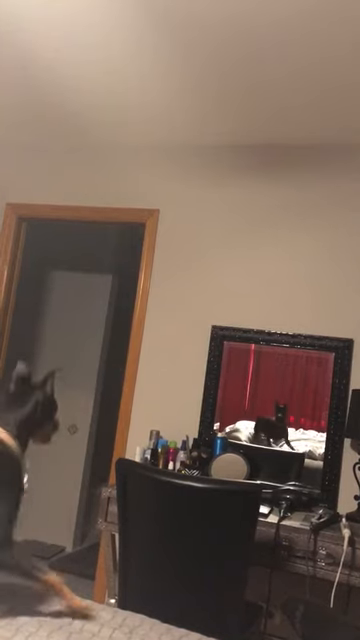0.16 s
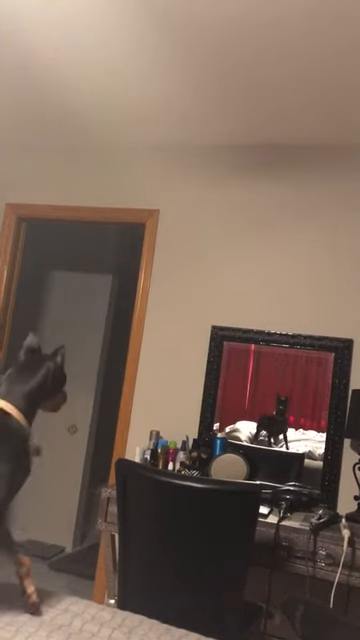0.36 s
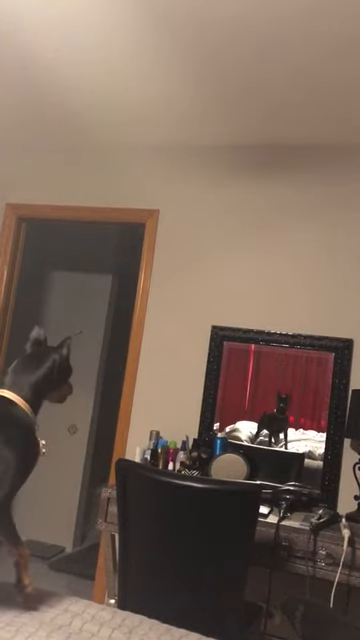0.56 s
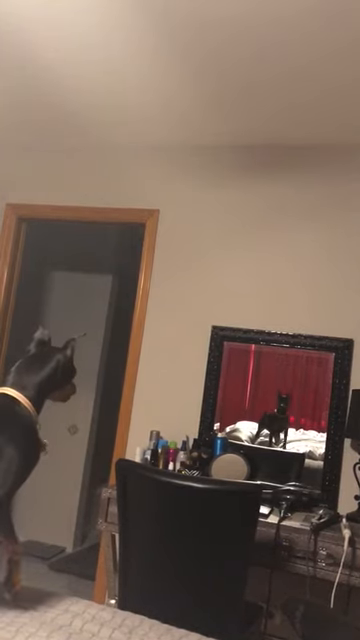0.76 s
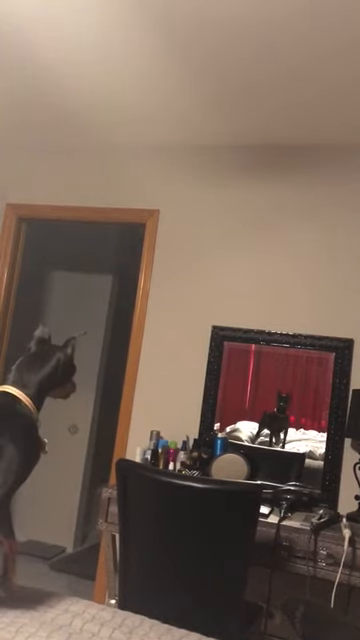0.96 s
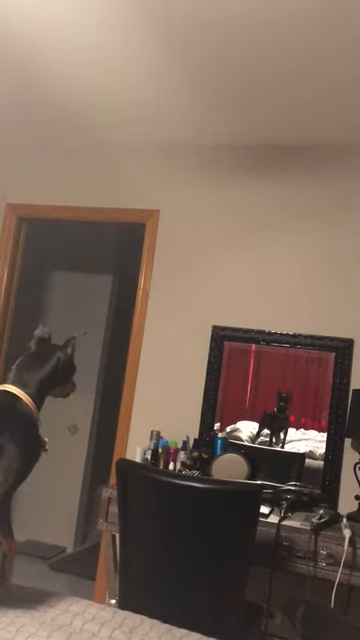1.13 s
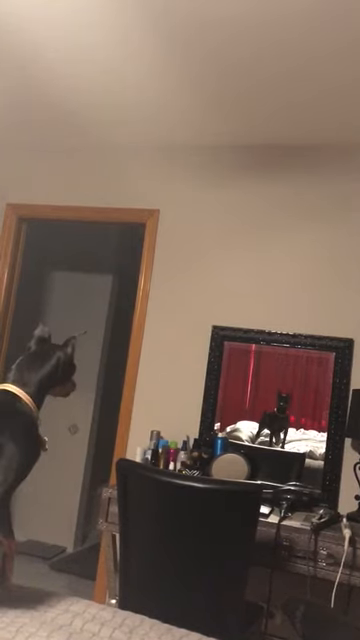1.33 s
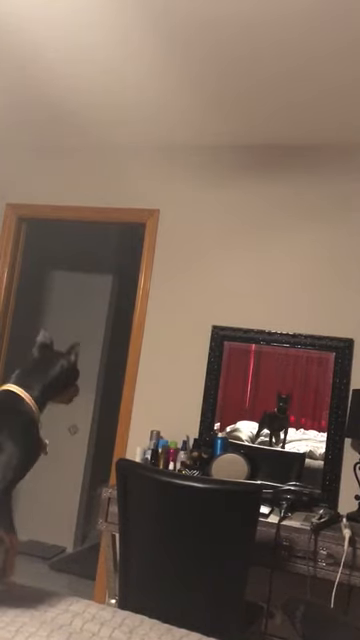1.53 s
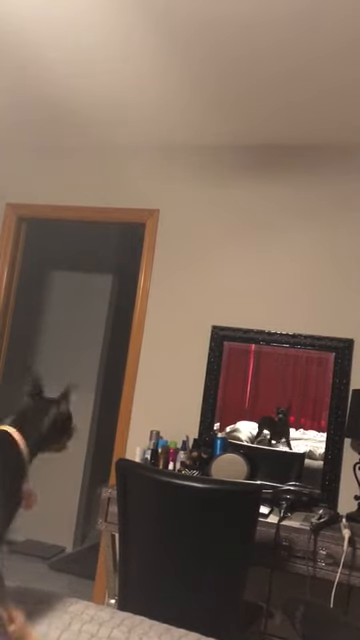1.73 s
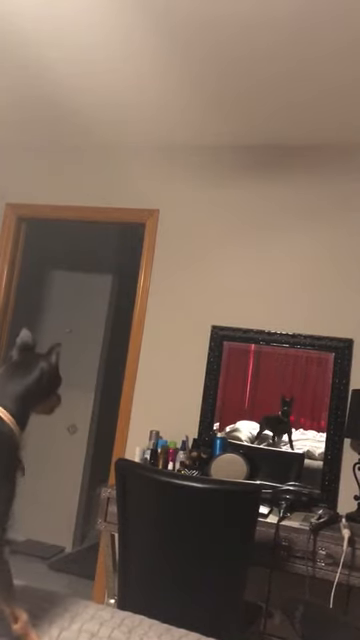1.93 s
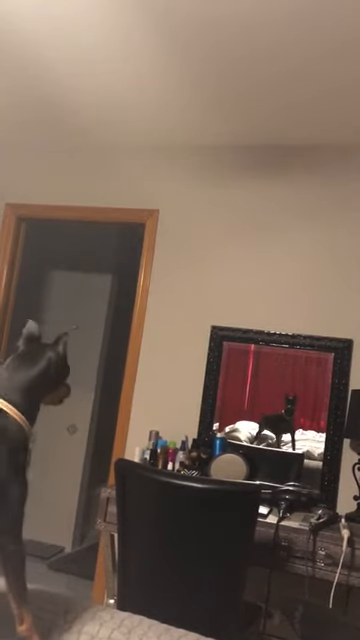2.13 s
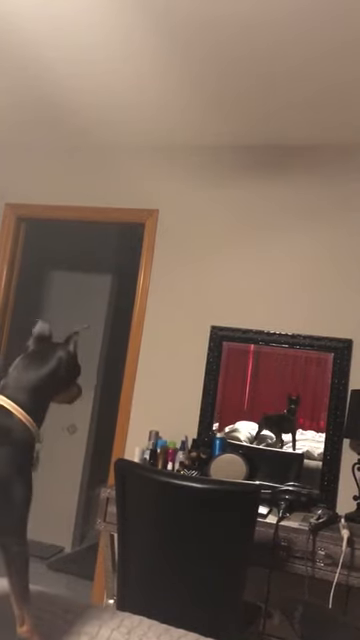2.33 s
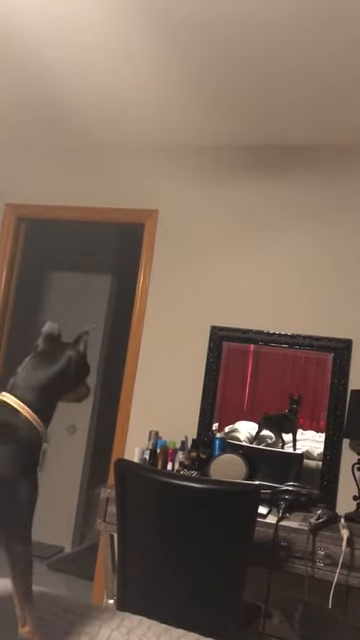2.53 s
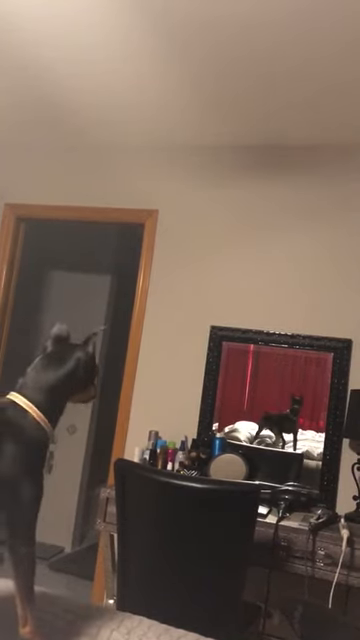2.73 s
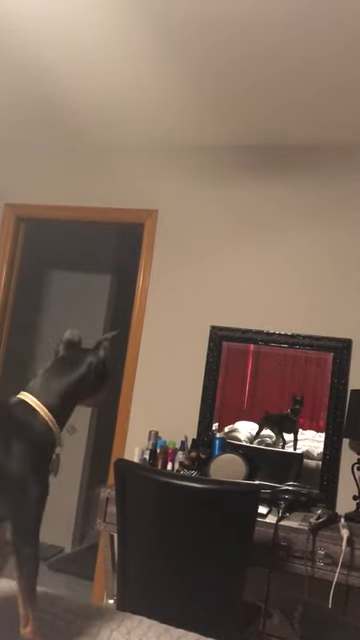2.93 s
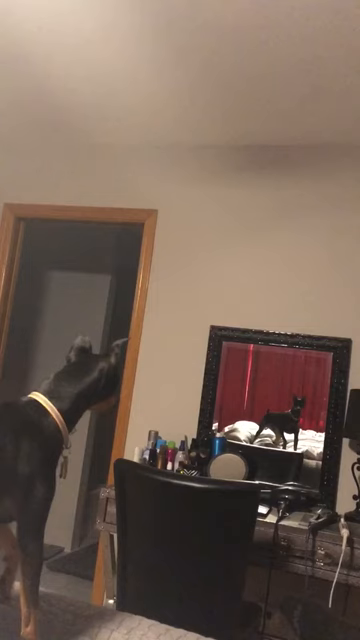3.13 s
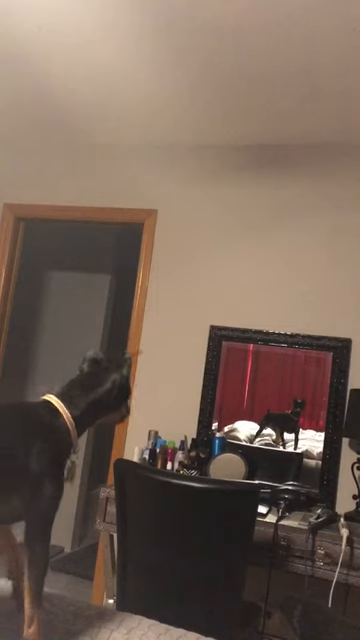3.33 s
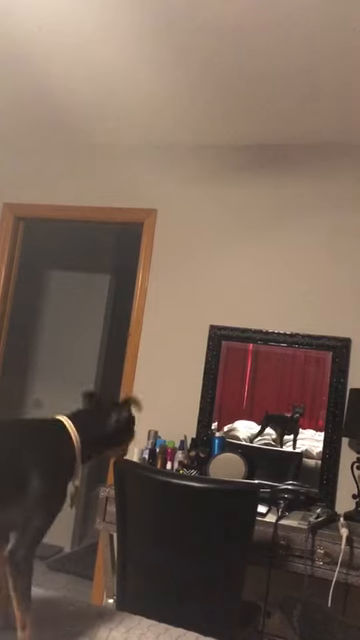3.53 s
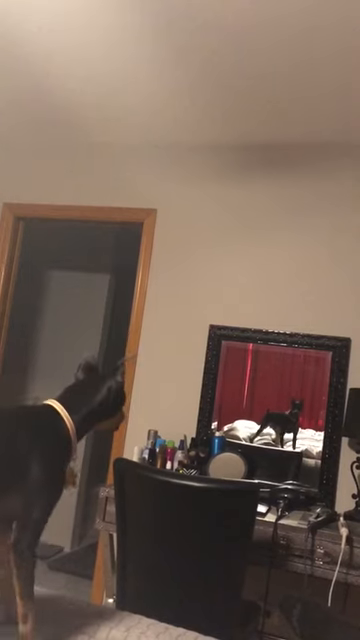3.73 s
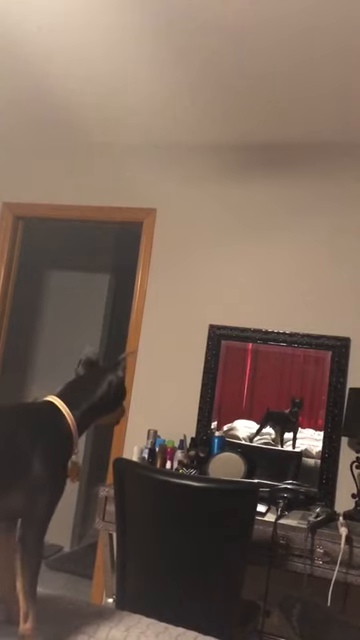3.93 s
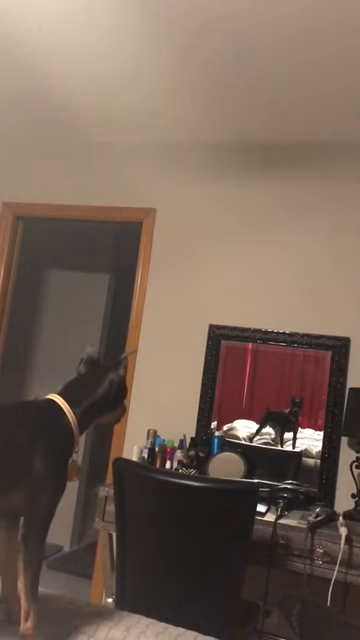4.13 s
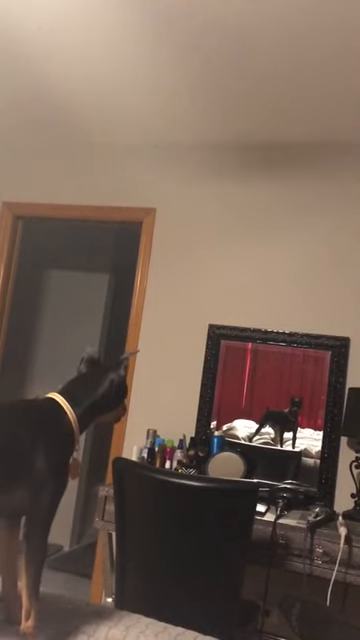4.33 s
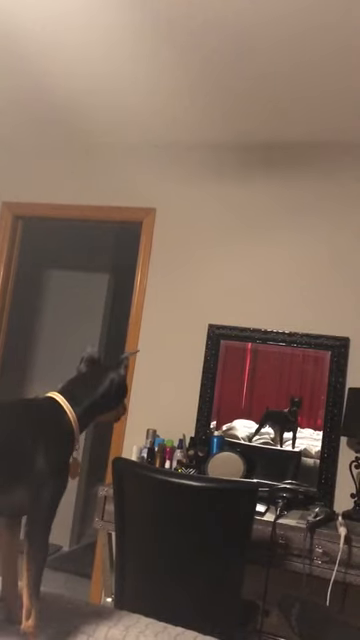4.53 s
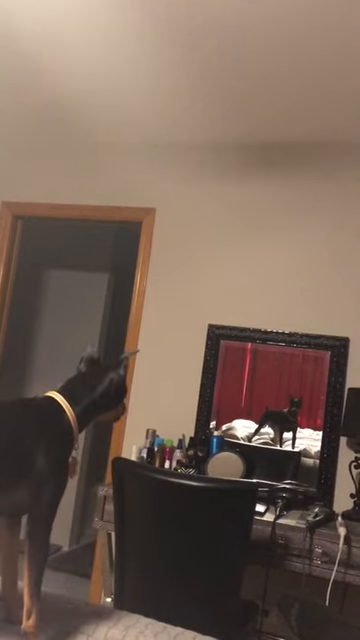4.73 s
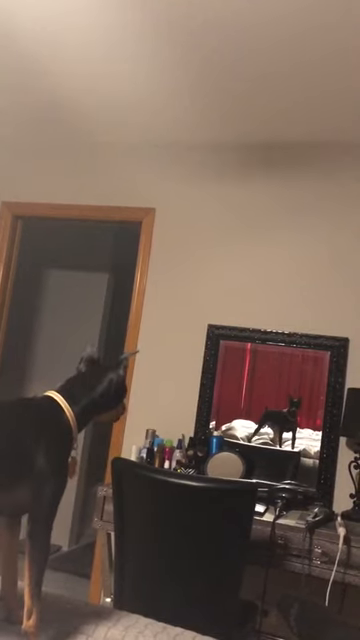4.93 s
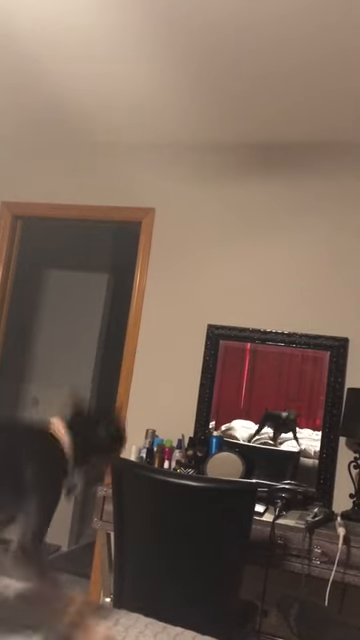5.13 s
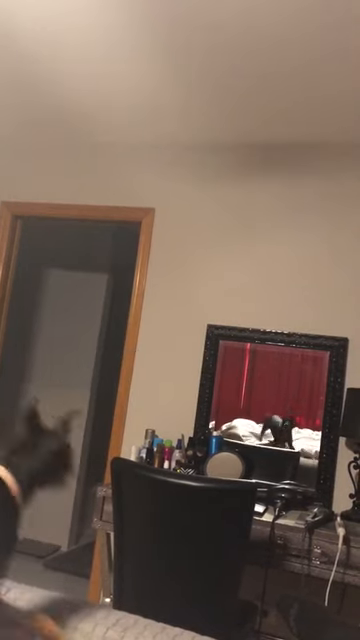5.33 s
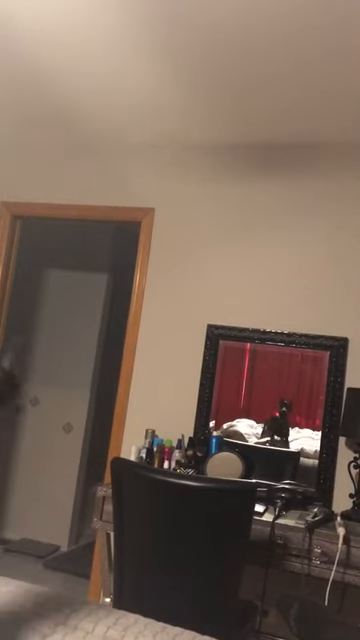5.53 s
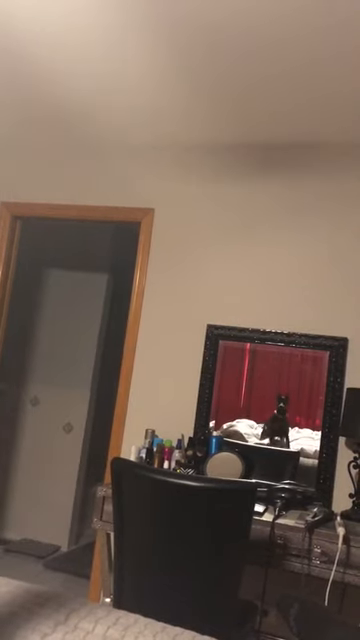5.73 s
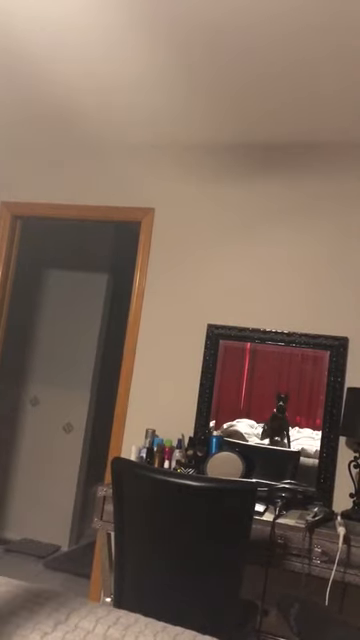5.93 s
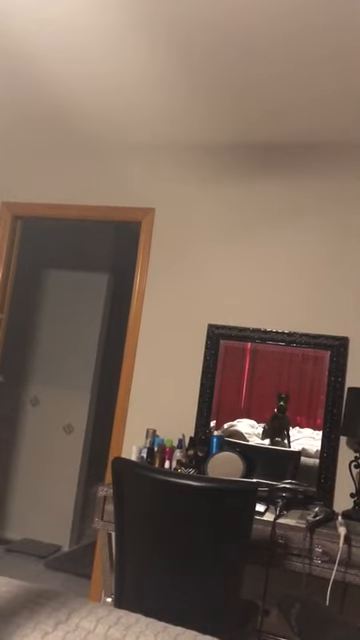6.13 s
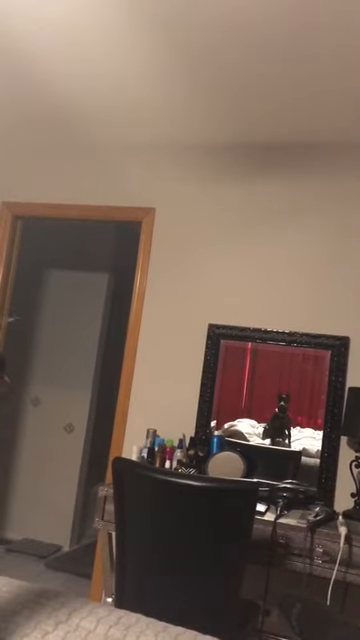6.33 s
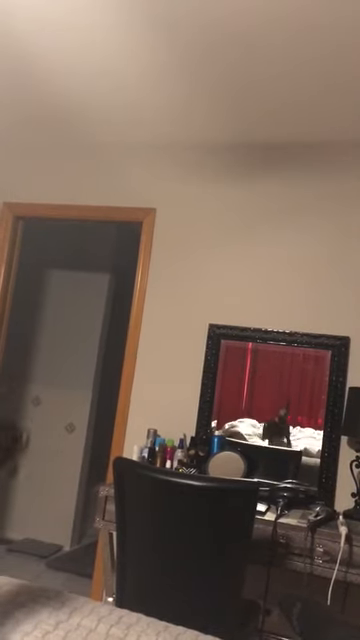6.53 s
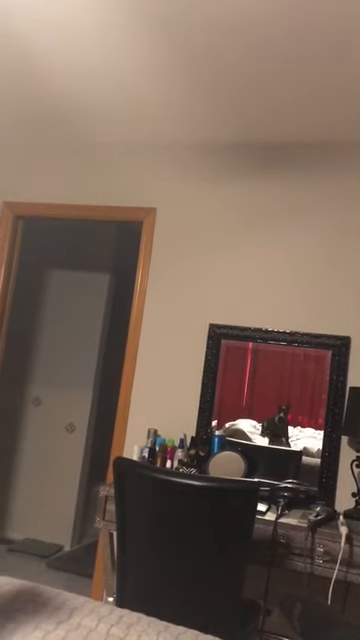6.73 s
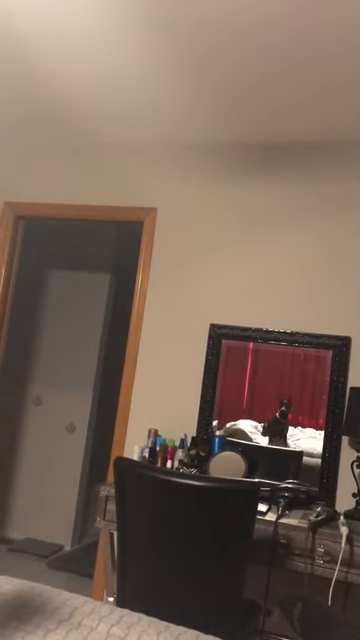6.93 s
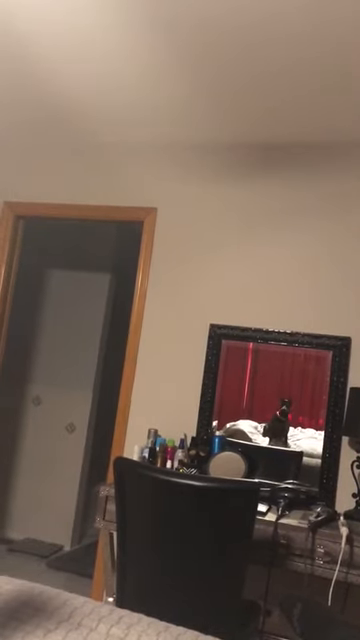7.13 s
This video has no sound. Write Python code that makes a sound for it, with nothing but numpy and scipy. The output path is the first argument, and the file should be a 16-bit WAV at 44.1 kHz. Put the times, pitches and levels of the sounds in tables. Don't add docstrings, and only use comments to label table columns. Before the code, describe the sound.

A smallish dog gives four sharp, hoarse single barks spaced seconds apart in a bedroom, with short growls, clinking collar tags and faint hum.

```python
import sys
import numpy as np
from scipy import signal
from scipy.fft import rfft, irfft, next_fast_len
from scipy.io import wavfile
from scipy.ndimage import uniform_filter1d, minimum_filter1d, map_coordinates

SR = 44100
rng = np.random.default_rng(int(sys.argv[2]) if len(sys.argv) > 2 else 0)


def linear_from_db(decibels):
    return 10 ** (np.asarray(decibels, float) / 20)


def wrap_up_sound(samples):
    columns = np.atleast_2d(samples).T
    tamed = np.clip(columns, -1, 1)
    steps = np.round(tamed * 32767).astype(np.int16)
    wavfile.write(sys.argv[1], SR, steps)


N = 316197
LEAD = SR // 2
M = N + LEAD

# start_s, effort_db, jaw_opening (0 shut, 1 wide)
BARKS = [
    [(1.6, -38, 0), (1.632, -17, .36), (1.66, -13.5, .48), (1.695, -13, .66), (1.73, -17, .82),
     (1.77, -16, 0.89), (1.8, -27, .86)],
    [(3.463, -37.5, 0), (3.487, -14.5, .24), (3.513, -12.5, 0.43), (3.54, -9.5, 0.65), (3.575, -13.5, 0.87),
     (3.605, -16.5, 0.97), (3.67, -34, 1.1)],
    [(5.126, -30.5, 0), (5.145, -18, 0.27), (5.172, -11.5, .45), (5.215, -13.5, 0.84), (5.255, -17.5, 0.98),
     (5.29, -17.5, 1.05), (5.34, -30, 1)],
    [(6.498, -23.5, .1), (6.519, -19, .38), (6.545, -17, .58), (6.575, -14, 0.87), (6.62, -18, .97),
     (6.655, -17, 0.96), (6.69, -38.5, 1)],
]
EARLIER_BARK = [
    (-.3, -8.5, .45),
    (-.22, -3.5, .83),
    (-.14, -6.5, 1),
]


def unit(x):
    return x / np.sqrt(np.mean(x ** 2) + 1e-20)


def along(points, hz):
    f, v = np.transpose(points)
    return np.interp(np.log(hz + 1), np.log(f + 1), v)


def wobble(rate, size):
    knots = rng.standard_normal(int(size * rate / SR) + 4)
    return map_coordinates(knots, [np.arange(size) * rate / SR])


def filtered(x, response):
    m = next_fast_len(len(x) + SR // 4)
    return irfft(rfft(x, m) * response(np.fft.rfftfreq(m, 1 / SR)), m)[:len(x)]


def peak(f, hz, width_hz):
    return 1j * f * width_hz / (hz * hz - f * f + 1j * f * width_hz)


def resonances(modes):
    return lambda f: sum((-1) ** k * linear_from_db(db) * peak(f, hz, w) for k, (hz, w, db) in enumerate(modes))


def add(track, s, x):
    part = track[round(s * SR) + LEAD:][:len(x)]
    part += x[:len(part)]


def opened(jaw, at):
    return np.clip(jaw / at, 0, 1)


def bark(rows, second_shut, second_open, third, breath, hoarse):
    # shut_hz, open_hz, arrives_at (jaw opening)
    throat_modes = [
        (579, 980, 1.01),
        (1239.7, 1590, .6),
        (1700, 2430, .9),
    ]
    # pitch_hz, level_db (per Hz)
    breath_hiss = [(2470, -33), (4200, -9), (5010, -11), (5390, -5), (6300, -6), (8000, 2), (9310, -6.5),
                   (12900, -13), (14400, -19.5), (16400, -36)]
    third_shut_db, third_open_at = -21, .52
    breath_shut_db, breath_open_at = -19, 0.87
    easy_db, fray_per_db, fray_open = -12.5, 0.02, 0.14

    s, *cols = np.transpose(sorted(rows))
    t = np.arange(s[0], s[-1] + 0.026, 1 / SR)
    db, jaw = [np.interp(t, s, c) for c in cols]
    hz1, hz2, hz3 = [shut + (wide - shut) * np.clip(jaw / at, 0, 1.05) for shut, wide, at in throat_modes]
    second_db = second_shut + (second_open - second_shut) * jaw
    third_db = third + third_shut_db * (1 - opened(jaw, third_open_at))
    breath_db = breath + breath_shut_db * (1 - opened(jaw, breath_open_at))
    noisy = np.clip(hoarse + fray_per_db * (easy_db - db) + fray_open * jaw ** 4, 0, 1)

    gate = linear_from_db(2.2 * wobble(170, len(t)))
    throb = unit(linear_from_db(3.9 * wobble(110, len(t))))
    puffs = unit(gate) * rng.standard_normal((2, len(t)))
    f, frames, z = signal.stft(puffs, SR, nperseg=512, noverlap=448)
    f = f[:, None]
    at = lambda c: np.interp(frames + s[0], t, c)

    throat = peak(f, at(hz1), 200)
    throat = throat - linear_from_db(at(second_db)) * peak(f, at(hz2), 230)
    throat = throat + linear_from_db(at(third_db)) * peak(f, at(hz3), 290)
    fourth = linear_from_db(at(third_db) - 18.0 - 10 * at(1 - opened(jaw, .7)))
    fourth = fourth * peak(f, 1.4 * at(hz3), 700) * peak(f, 1.45 * at(hz3), 1100)
    throat = linear_from_db(19.5) * throat * peak(f, 1350, 2700) ** 2
    throat = throat / (1 + (f / (1.2 * at(hz3))) ** 9)
    throat = throat / (1 + (0.46 * at(hz1) / (f + 1)) ** 4)

    patches = uniform_filter1d(rng.standard_normal(z[1].shape), size=7, axis=0)
    patches = unit(uniform_filter1d(patches, size=24, axis=1))
    teeth = linear_from_db(along([(2500, -60.0), *breath_hiss], f) + 4.5 * patches)
    teeth = teeth * (1 + 1.4 * np.abs(peak(f, 2.4 * at(hz3), 550)) ** 2)
    shaped = z * [throat - linear_from_db(17.5) * fourth, teeth]
    rasp, hiss = signal.istft(shaped, SR, nperseg=512, noverlap=448)[1][:, :len(t)]

    locked = 0
    for hz, level in ((hz1, 0), (hz2, second_db), (hz3, third_db - 2.0)):
        phase = 2 * np.pi * np.cumsum(hz * (1 + .033 * wobble(100, len(t)))) / SR
        locked = locked + linear_from_db(level + 2.0 + 5.3 * wobble(90, len(t))) * np.sin(phase)
    voice = np.sqrt(1 - noisy) * locked + np.sqrt(noisy) * rasp

    onset = np.sin(np.pi / 2 * np.clip((t - s[0]) / 0.0047, 0, 1)) ** 2
    release = linear_from_db(-1500 * np.clip(t - s[-1], 0, 1))
    breathing = throb ** 0.36 * linear_from_db(breath_db + 0.5) * unit(hiss)
    return s[0], onset * release * linear_from_db(db) * (throb * voice + breathing)


def barks():
    # second_shut_db, second_open_db, third_db, breath_db, hoarseness (0-1)
    colours = [
        (1.5, 1.5, 1, -17, .5),
        (-2.5, -2, -3.5, -21, 0.5),
        (2, -.5, 0.5, -17.5, .52),
        (13, -0.86, -1, -18.5, 0.4),
        (0, -0.12, -0.5, -16.5, 0.8),
    ]
    out = np.zeros(M)
    for rows, colour in zip([*BARKS, EARLIER_BARK], colours):
        add(out, *bark(rows, *colour))
    return out


def growl():
    # start_s, level_db (peak), nasal_db
    slaps = [(1.417, -40.5, -16), (1.446, -37, -18.5), (1.48, -38.5, -16), (1.51, -34.5, -17),
             (1.547, -42.5, -12), (1.578, -32.5, -14.5), (1.6, -26, -12), (1.614, -18.5, -15),
             (3.401, -35, -9), (3.436, -35.5, -7), (3.463, -24.5, -18.5), (3.472, -20, -19.5),
             (5.102, -36, -2), (5.126, -26.5, -13), (5.137, -17.5, -34), (6.478, -48.5, 4),
             (6.496, -27.5, -12.5), (6.507, -19.5, 6)]
    # pitch_hz, width_hz, level_db
    chest_modes = [(173.9, 36, -1.5), (359.6, 270, 0.5), (566, 180, -1.5)]
    # pitch_hz, width_hz, level_db
    nose_modes = [(780, 230, -2.5), (1060, 240, 1.5), (1402.5, 200, -12), (2000, 200, -9)]
    chest, nose = np.zeros((2, M))
    slap, t = np.hanning(76), np.arange(1300) / SR
    for s, db, nasal_db in slaps:
        add(chest, s + 0.0037, linear_from_db(db + 9.0) * slap)
        add(chest, s + 0.012, linear_from_db(db + 0.5) * slap)
        puff = linear_from_db(db + nasal_db + 11.0 - 60 * t / 0.14) * (1 - np.exp(-t / .004))
        add(nose, s, puff * rng.standard_normal(len(t)))
    closed = lambda f: resonances(chest_modes)(f) * peak(f, 330, 750)
    nasal = lambda f: resonances(nose_modes)(f) * peak(f, 1500, 1600) ** 2
    return filtered(chest, closed) + filtered(nose, nasal)


def nostrils():
    # start_s, level_db, pitch_hz, t60_s
    whistles = [
        (1.418, -72, 3050, 0.081),
        (1.48, -72.5, 3200, .1),
        (1.52, -74, 3298, .1),
        (3.4, -57, 3040, 0.11),
        (3.475, -44.5, 4850, .12),
    ]
    out, t = np.zeros(M), np.arange(SR // 10) / SR
    for s, db, hz, t60 in whistles:
        level = linear_from_db(db + 4 * wobble(90, len(t)) - 60 * t / t60)
        add(out, s, level * np.sin(2 * np.pi * hz * t + 2.5 * wobble(250, len(t))))
    return out


def tail(decays):
    hz, t, z = signal.stft(rng.standard_normal(SR), SR, nperseg=256)
    fade = linear_from_db(-60 * t / along(decays, hz)[:, None])
    echo = signal.istft(z * fade, SR, nperseg=256)[1]
    return echo / np.linalg.norm(echo)


def room(x):
    # pitch_hz, t60_s
    bedroom = [(200, 0.37), (800, 0.32), (1600, 0.34), (2400, 0.31), (4000, 0.34), (9000, 0.29),
               (15000, 0.19)]
    # pitch_hz, t60_s
    hall = [(300, 0.53), (900, 0.83), (1600, 0.82), (2400, 0.65), (4000, 0.78), (9000, .3)]
    out = np.zeros(M + 2 * SR)
    for start in range(0, M, SR // 2):
        echo = tail(bedroom) + linear_from_db(-26.5) * tail(hall)
        wet = signal.fftconvolve(x[start:start + SR // 2], echo)
        out[start + 200:][:len(wet)] += wet
    return out[:M]


def contacts():
    # start_s, level_db (peak), large_plate_db, small_plate_db
    knocks = [(0.0605, -49, -11, -13), (0.1035, -40, -18.5, -16), (0.1436, -55, -21, -23),
              (0.1759, -37, -25, -15), (0.2001, -38.5, -41, -30), (0.3368, -39, -22, -6),
              (0.3574, -43.5, -15, -13), (0.618, -42, -27, -22), (0.6472, -51.5, -26, -24),
              (1.8718, -44.5, -31.5, -23), (2.0498, -51, -14, -5), (2.071, -33.5, -10, -13.5),
              (2.189, -45.5, -18, -14.5), (2.2084, -51, -10, -9.5), (5.4124, -42.5, -16, -3),
              (5.444, -39.5, -16.5, -20), (5.5345, -31.5, -22, -12), (5.5594, -38, -43, -16),
              (5.6101, -38, -32.5, -22), (5.6227, -35.5, -32, -15), (5.7519, -46.5, -29, -17.5),
              (5.8818, -43.5, -24, -15), (5.8917, -50.5, -36, -17.5), (6.81, -47, -17, -6),
              (6.8213, -28, -13.5, -29), (6.8334, -37, -12, -6), (6.9716, -49.5, -34, -9),
              (6.9796, -51, -22, -3.5), (7.016, -34.5, -20, -16.5), (7.0288, -48.5, -23.5, -22)]
    # start_s, level_db (peak)
    touches = [(-.02, -43.5), (.527, -70), (.755, -66.5), (0.8058, -49.5), (0.99, -49), (1.1658, -50),
               (1.3463, -57), (1.946, -61), (1.992, -60.5), (2.421, -70), (3.822, -67), (3.953, -60.5),
               (5.845, -60.5), (6.228, -68), (6.74, -47.5)]
    # level_db of large plate, buckle, loop, small plate
    touch_db = (-24, -20, -24, -13.5)
    buckle_db, loop_db, scatter_db = -24.5, -17.5, 2
    luck = scatter_db * rng.standard_normal((len(knocks) + len(touches), 4))
    firm = []
    for (s, db, big, small), (a, b, *_) in zip(knocks, luck):
        firm.append((s, db, big, buckle_db + a, loop_db + b, small))
    light = [(s, db, *(np.array(touch_db) + row)) for (s, db), row in zip(touches, luck[len(knocks):])]
    return firm + light


def tags():
    # pitch_hz, level_db, t60_s, rise_s
    plates = [
        [(5710, -2, 0.16, 0.0074)],
        [(6294, 1.5, 0.19, 0.0032)],
        [(9600, -2.5, 0.072, 0.00092)],
        [(13010, -1.5, 0.075, 0.0018), (13900, -5, .065, .002)],
    ]
    # pitch_hz, level_db
    clink = [(1200, -28), (2200, -13.5), (3300, -8), (6000, -6), (9000, -0.5), (12000, 4), (15500, -8)]
    out, clicks, t = np.zeros(M), np.zeros(M), np.arange(SR // 6) / SR
    for s, db, *rings_db in contacts():
        for modes, ring_db in zip(plates, rings_db):
            for hz, level, t60, rise in modes:
                swing = linear_from_db(3.18 * wobble(57.1, len(t))) * (1 - np.exp(-t / rise))
                phase = 2 * np.pi * hz * (1 + rng.normal(0, .003)) * t + 1.4 * wobble(120, len(t))
                decay = linear_from_db(db + ring_db + level + 0.95 - 60 * t / t60)
                add(out, s, decay * swing * np.sin(phase))
        gaps, sizes = rng.uniform(0.0029, 0.014, size=3), rng.normal(0, 2.8, size=3)
        for delay, size in zip(np.cumsum(gaps) - gaps[0], sizes):
            click = linear_from_db(db - 4.5 + size - 360 * delay - 60 * t[:600] / 0.011)
            add(clicks, s + delay, click * rng.standard_normal(600))
    return out + filtered(clicks, lambda f: linear_from_db(along(clink, f)))


def floor():
    # pitch_hz, level_db (rms)
    mains = [(59.2, -74), (118.4, -66.5), (242.2, -83), (290.7, -83), (360.7, -86), (721.4, -88.5),
             (839.8, -92), (1600, -95), (2406, -96)]
    # pitch_hz, level_db (per Hz)
    air_colour = [(26, -36.5), (45, -5), (76, -10.5), (124, 0.5), (179, -13), (293, -13.5), (544, -21.5),
                  (713, -18), (787, -24.5), (1060, -21.5), (2770, -32), (11300, -38), (15200, -45),
                  (16400, -58)]
    hum_db, air_db = 4, -70.5
    duck_db, duck_s, air_share = 7.5, .5, .15
    t = np.arange(N) / SR
    since = np.clip([(t - rows[0][0]) / duck_s for rows in [*BARKS, EARLIER_BARK]], 0, None)
    duck = -duck_db * np.sum(since ** 2 * np.exp(2 - 2 * since), axis=0)
    hum = 0
    for hz, db in mains:
        phase = 2 * np.pi * hz * t + 0.33 * wobble(15, N)
        hum = hum + linear_from_db(db + 2.5 + 1.5 * wobble(8, N)) * np.sin(phase)
    air = unit(filtered(rng.standard_normal(N), lambda f: linear_from_db(along([(15, -58.5), *air_colour], f))))
    air_level = linear_from_db(air_db + 3.5 + air_share * duck + 0.51 * wobble(9, N))
    return hum * linear_from_db(hum_db + duck) + air_level * air


def paws():
    # start_s, level_db (peak)
    steps = [(0.017, -52.5), (0.079, -54), (1.699, -49), (1.776, -46), (1.829, -62.5), (3.548, -53),
             (3.617, -51), (5.238, -49.5), (5.299, -44.5), (5.357, -59.5), (5.421, -54), (5.478, -56.5),
             (6.58, -57), (6.652, -47)]
    # pitch_hz, level_db
    mattress = [(20, -7.5), (70, -4), (160, 1), (350, -8), (700, -29), (1500, -70)]
    puffs, bump = np.zeros(M), np.hanning(2600)
    for s, db in steps:
        add(puffs, s - .01, linear_from_db(db + 16.5) * bump * rng.standard_normal(len(bump)))
    return filtered(puffs, lambda f: linear_from_db(along(mattress, f)))


def scene():
    voice = barks() + growl() + nostrils()
    metal = tags()
    near = voice + metal + paws() + room(linear_from_db(-7.0) * voice + linear_from_db(-3.0) * metal)
    return (near[LEAD:] + floor())[None]


def top_cut(x):
    return signal.sosfilt(signal.butter(12, 16510, fs=SR, output="sos"), x)


def record(dry):
    top = .69
    need = np.minimum(1, top / (np.abs(dry) + 1e-9))
    held = minimum_filter1d(need, size=131, axis=1)
    gain = uniform_filter1d(held, size=65, axis=1)
    return top_cut(dry * gain)


dry = scene()
out = record(dry)
wrap_up_sound(out)
```